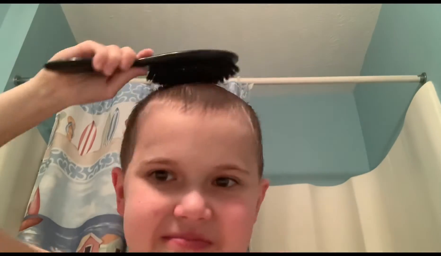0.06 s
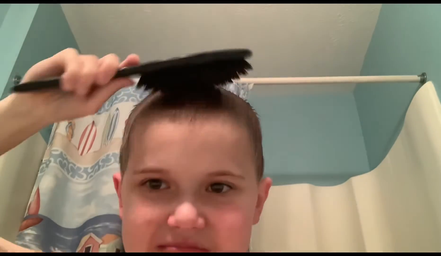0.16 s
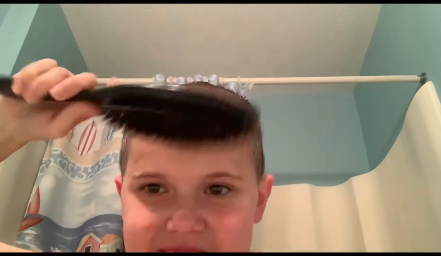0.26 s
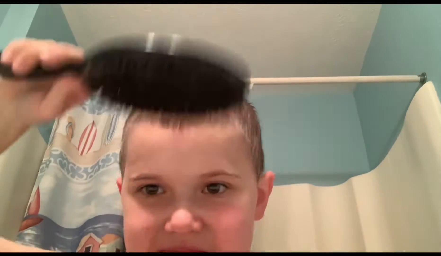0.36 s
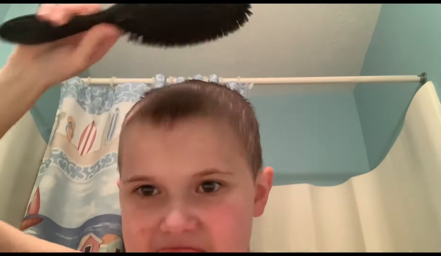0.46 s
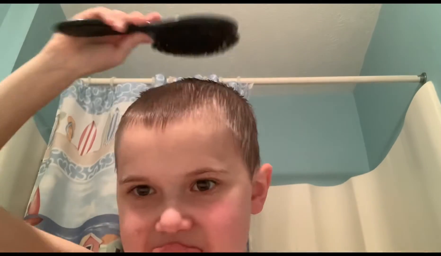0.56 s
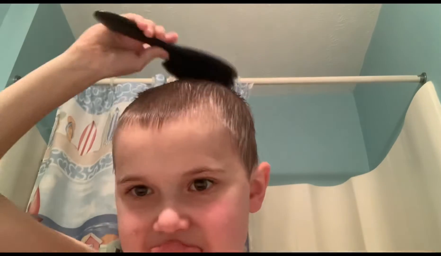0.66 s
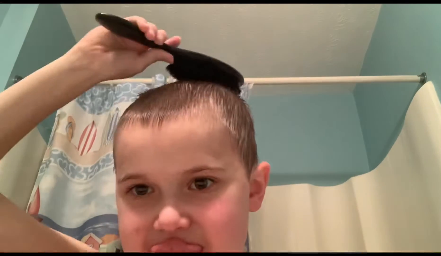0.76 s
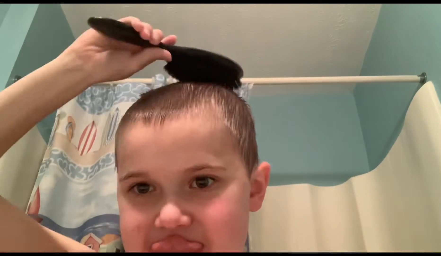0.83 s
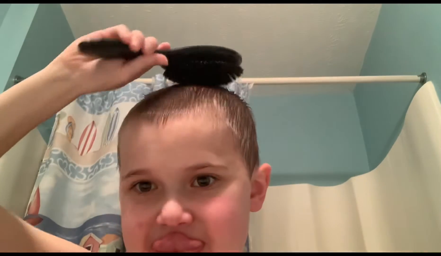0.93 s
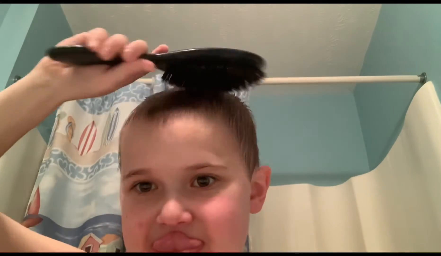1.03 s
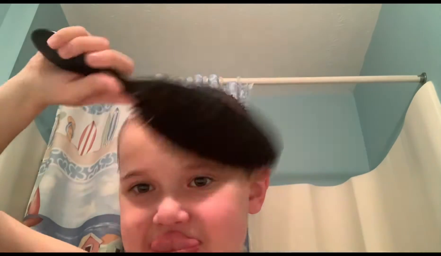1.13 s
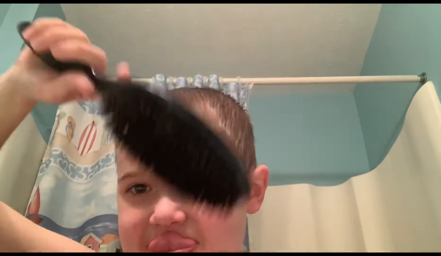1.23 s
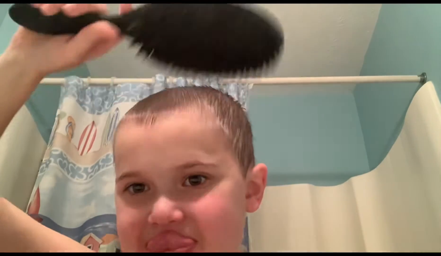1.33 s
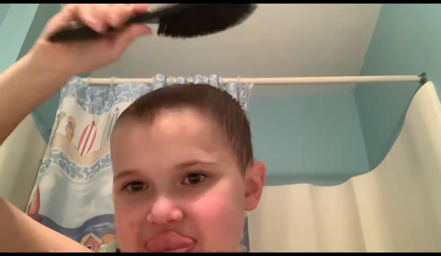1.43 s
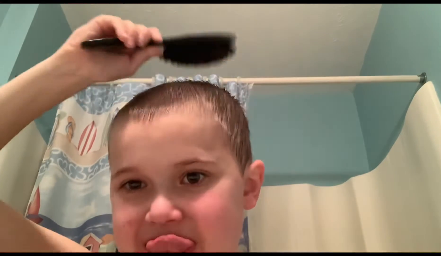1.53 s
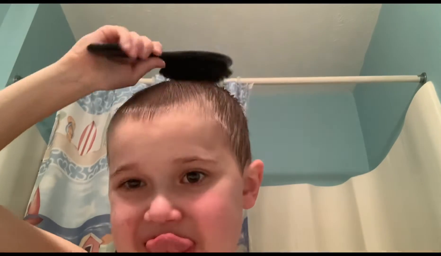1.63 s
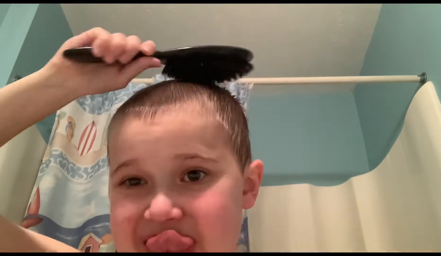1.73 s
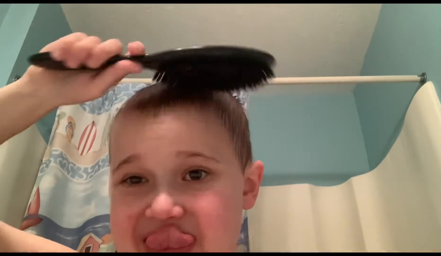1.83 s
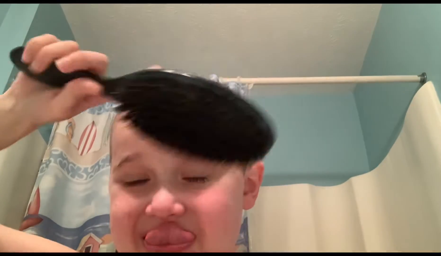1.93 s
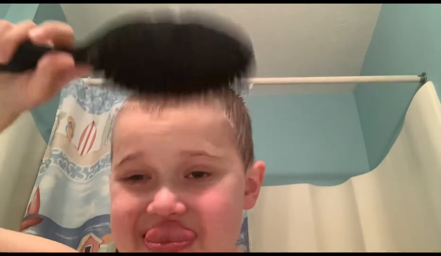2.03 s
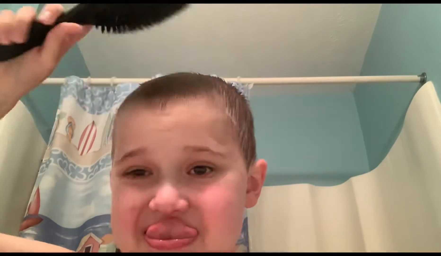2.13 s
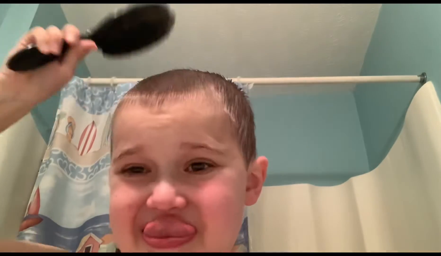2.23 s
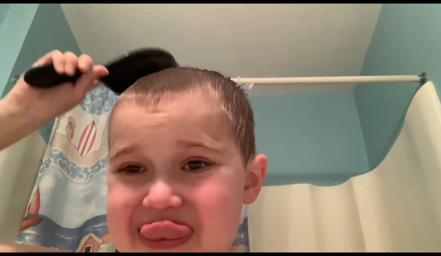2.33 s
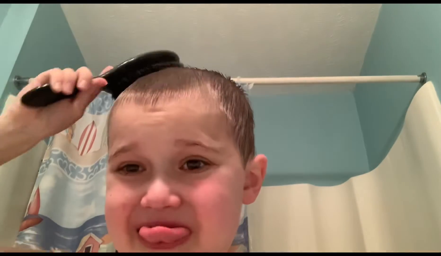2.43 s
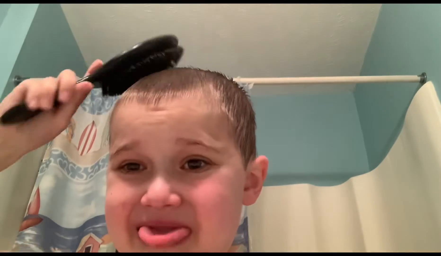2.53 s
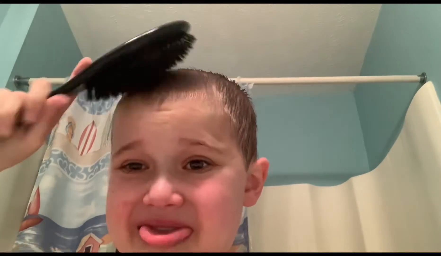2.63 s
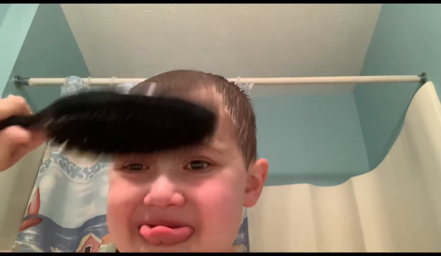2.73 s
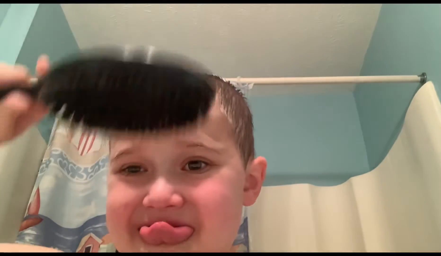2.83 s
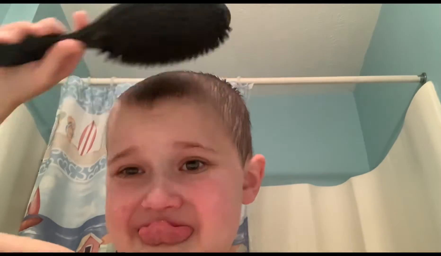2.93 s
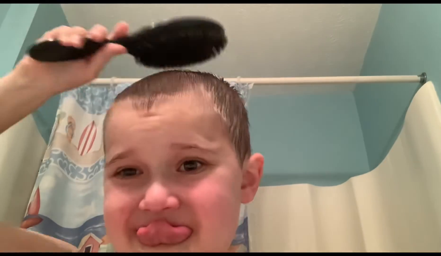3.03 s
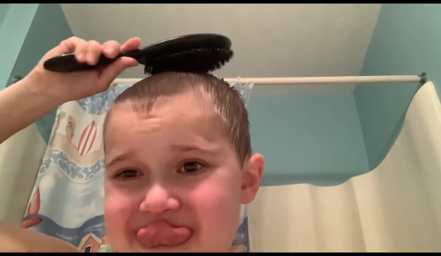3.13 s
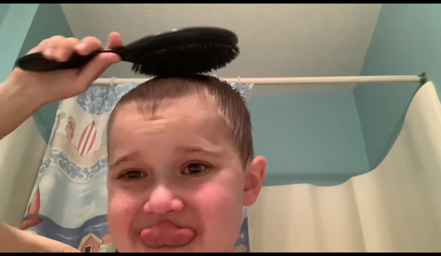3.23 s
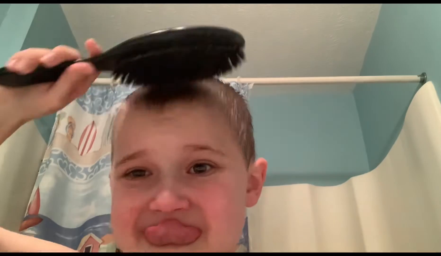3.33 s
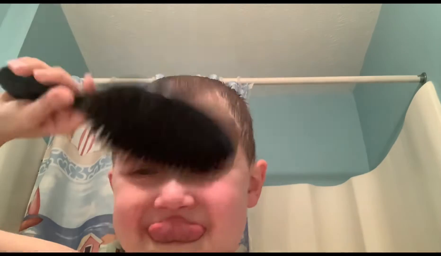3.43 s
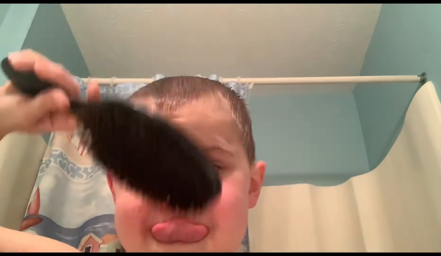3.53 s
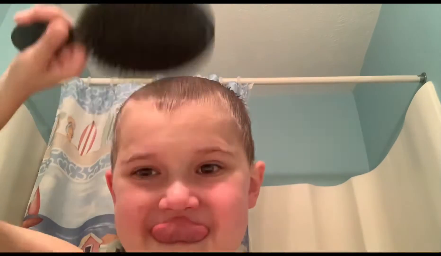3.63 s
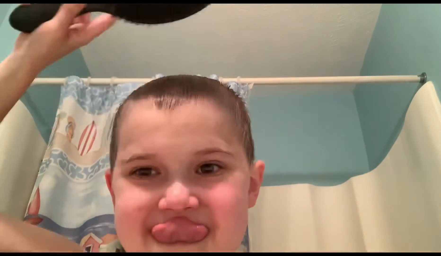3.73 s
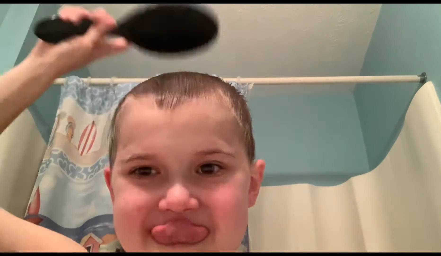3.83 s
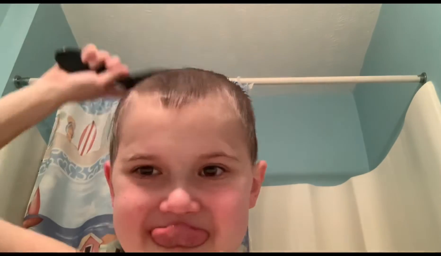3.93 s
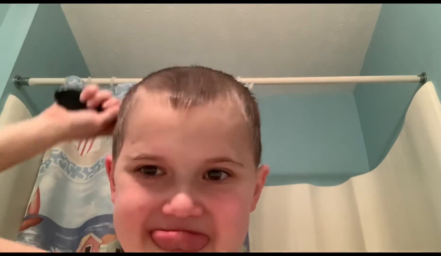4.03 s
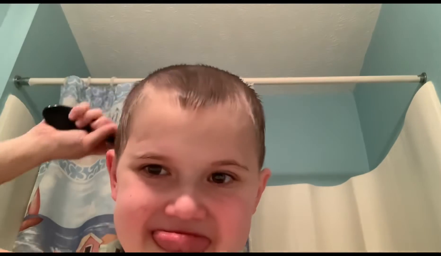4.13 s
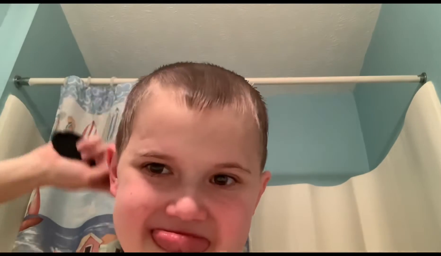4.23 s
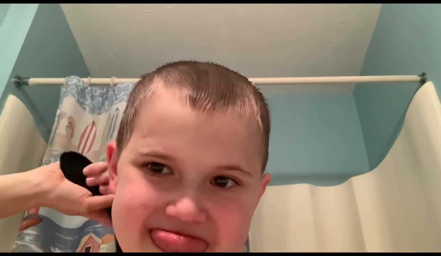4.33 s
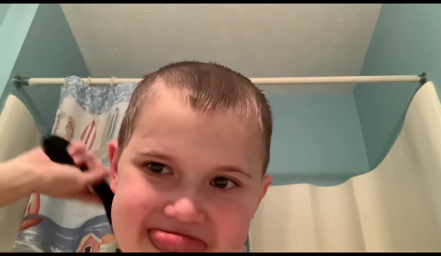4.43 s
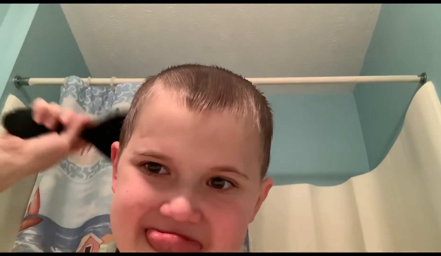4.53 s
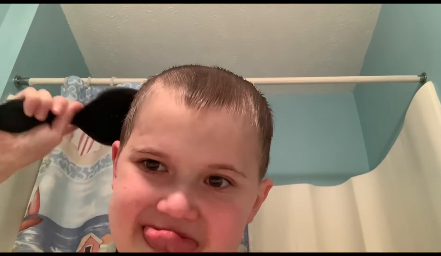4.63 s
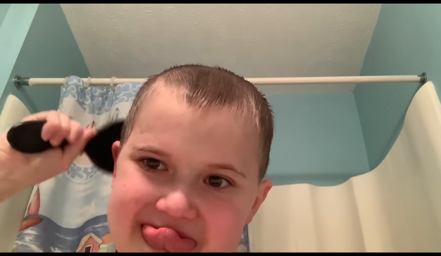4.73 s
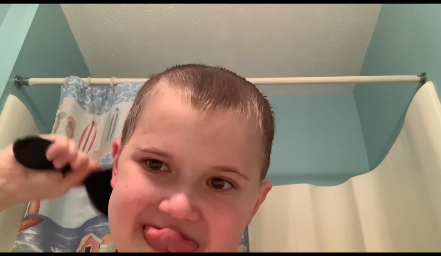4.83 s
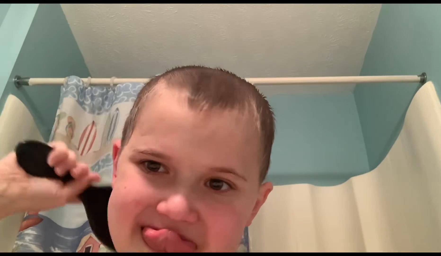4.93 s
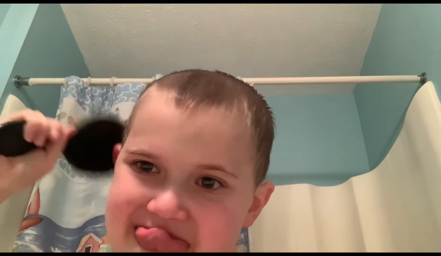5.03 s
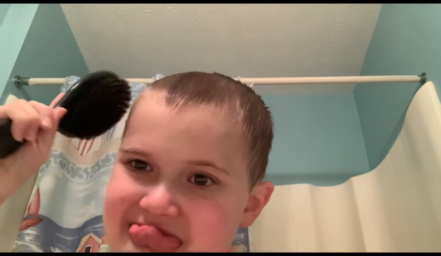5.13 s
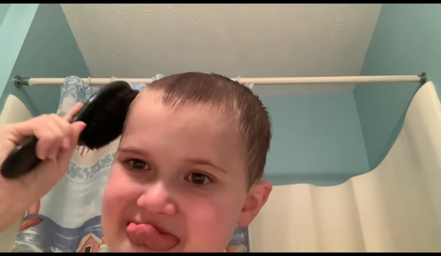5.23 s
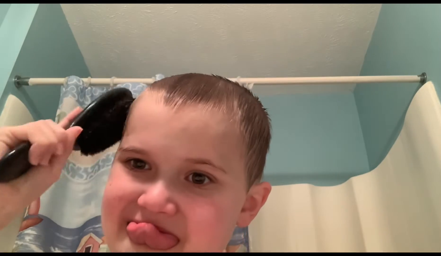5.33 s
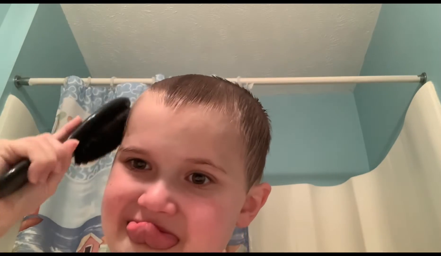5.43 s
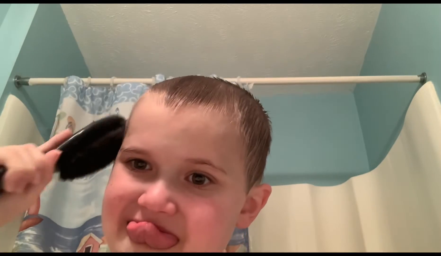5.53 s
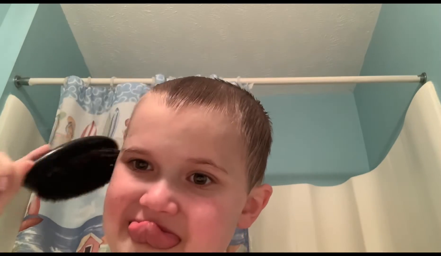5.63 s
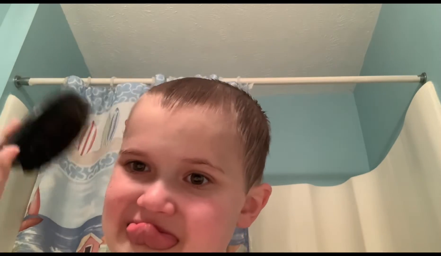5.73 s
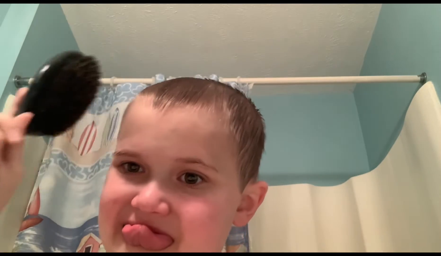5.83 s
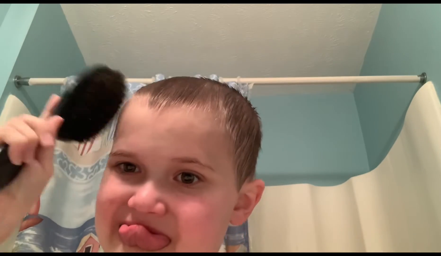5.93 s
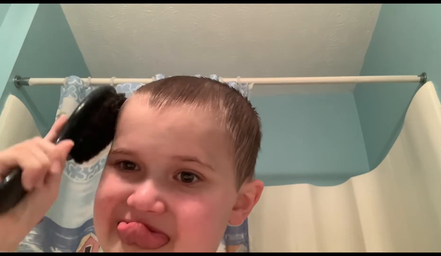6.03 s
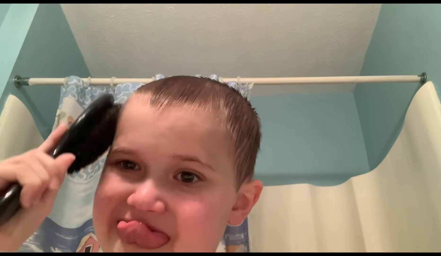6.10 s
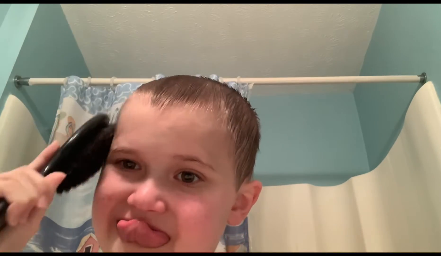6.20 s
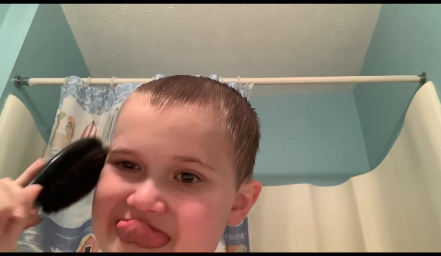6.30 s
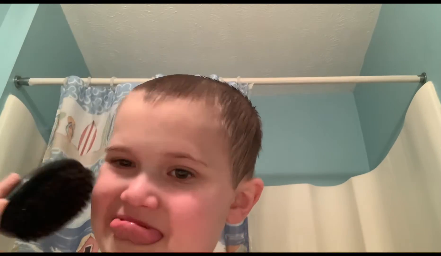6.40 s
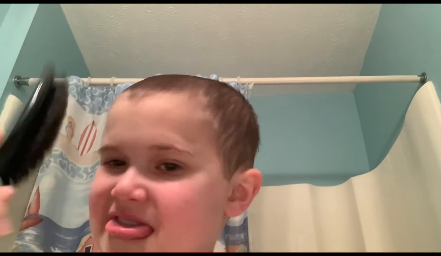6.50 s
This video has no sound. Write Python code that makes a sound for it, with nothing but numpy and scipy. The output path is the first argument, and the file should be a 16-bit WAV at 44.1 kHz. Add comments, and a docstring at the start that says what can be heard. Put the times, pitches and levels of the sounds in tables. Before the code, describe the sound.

A hollow plastic brush taps onto a head, then its bristles rasp through short damp hair in separate swelling strokes, about one every half second to second. Dull knocks and crisp bristle flicks punctuate the early strokes; later ones at the side are duller and softer. Close stereo microphone in a small reflective bathroom, with faint air hiss, low arm-movement rumble and weak fan hum.

```python
"""A tap on hollow plastic opens a swelling rasp: a brush drawn again and again through short damp hair in a bathroom.
Each landing rings the modes of the brush back; then thousands of bristle slips, random clicks, swell and die away.
Bright noise flicks and dull knocks of falling pitch punctuate the strokes; hard walls answer with filtered noise tails.
Underneath lie airy hiss, a low rumble of arm movement, a wavering fan hum and two faint tones, heard at two close ports.
"""
import sys
import numpy as np
from scipy import signal
from scipy.fft import rfft, irfft
from scipy.io import wavfile
from scipy.ndimage import map_coordinates

SR = 44100
rng = np.random.default_rng(int(sys.argv[2]) if len(sys.argv) > 2 else 0)


def inscribe(sig):
    """Save sig as 16-bit PCM at rate SR to the path in sys.argv[1].

    A 1-D sig is mono; a 2-D sig holds one channel per row.
    Samples are clipped to [-1, 1] before scaling.
    """
    pcm = np.round(np.clip(np.atleast_2d(sig).T, -1, 1) * 32767)
    wavfile.write(sys.argv[1], SR, pcm.astype(np.int16))


N = 289254   # length in samples


def from_db(db):
    """Decibels to gain."""
    return 10 ** (np.asarray(db, float) / 20)


def rms_one(x):
    """Scale to unit rms."""
    return x / np.sqrt(np.mean(x ** 2) + 1e-20)


def cut(x, hz, kind, order=2):
    """Butterworth filter."""
    return signal.sosfilt(signal.butter(order, hz, kind, fs=SR, output="sos"), x)


def coloured(x, points):
    """Impose a smooth spectrum, drawn in dB over log frequency."""
    hz, db = np.transpose(points)
    grid = np.fft.rfftfreq(N, 1 / SR) + 1
    gain = from_db(np.interp(np.log(grid), np.log(hz), db, left=-60))
    return irfft(rfft(x) * gain, N)


def drift(rate_hz):
    """Random wander of unit rms: white noise through two equal one-pole low-passes."""
    r = np.exp(-2 * np.pi * rate_hz / SR)
    wander = signal.lfilter([1], [1, -2 * r, r * r], rng.standard_normal(N + SR))
    return rms_one(wander[SR:])   # drop the filter's start-up


def ring(clicks, hz, t60):
    """A resonant mode: a unit click sets off a dying sine of starting height 1."""
    r, w = from_db(-60 / (t60 * SR)), 2 * np.pi * hz / SR
    return signal.lfilter([0, np.sin(w)], [1, -2 * r * np.cos(w), r * r], clicks + 1e-18)


def add(out, s, sound):
    """Mix a sound in at time s."""
    i = round(s * SR)
    out[..., i:i + sound.shape[-1]] += sound[..., :N - i]


# spectrum of room air and hiss: f/Hz, relative density/dB
AIR = [(25, -33), (50, 14), (150, -4), (300, -3), (600, -9), (1200, -9.5), (2500, -14.5), (6000, -18),
       (10000, -17), (15000, -20), (18000, -36)]


def air():
    """Room air and hiss: independent coloured noise at each port."""
    level_db = -58
    return from_db(level_db) * rms_one(coloured(rng.standard_normal((2, N)), AIR))


# swells of arm and floor movement: t/s of the top, length/s, deep level/dB, upper level/dB
RUMBLE = [(0.0, 0.031, -50, -60), (0.224, 0.088, -46, -29), (0.324, 0.068, -48, -38.5),
          (.8, 0.029, -48, -64), (1.296, 0.074, -47, -46), (1.698, .04, -53, -56), (2.493, .04, -55, -55),
          (4.032, 0.11, -49, -38.5), (4.187, .2, -46, -38.5), (4.916, .14, -50.5, -62),
          (5.355, 0.14, -45.5, -61), (5.93, 0.13, -38.5, -57), (6.052, .04, -45, -40),
          (6.427, .1, -39.5, -65), (6.55, 0.1, -46, -40.5)]


def rumble_curves():
    """Bell-shaped swells, quicker up than down, over a still level."""
    rise_share = 0.49          # rise as a share of the length
    still_db = (-66, -58.5)    # deep, upper level between swells
    t = np.arange(N) / SR
    power = from_db(still_db)[:, None] ** 2
    for s, length, *levels_db in RUMBLE:
        width = length * np.where(t < s, rise_share, 1)
        bell = np.exp(-((t - s) / width) ** 2)
        power = power + (from_db(levels_db)[:, None] * bell) ** 2
    return 10 * np.log10(power)


def rumble():
    """Arm and floor movement: two low noise bands with lumpy levels, mostly alike at both ports."""
    out = np.zeros((2, N))
    for level_db, band_hz in zip(rumble_curves(), ([32, 60], [75, 133.8])):
        mid, side = cut(rng.standard_normal((2, N)), band_hz, "band")
        both = rms_one(mid + 0.4 * side * [[1], [-1]])
        lumps_db = 0.5 * drift(22)
        out += from_db(level_db + lumps_db) * both
    return out


def fan_hum():
    """A sine whose pitch and level waver."""
    centre_hz, level_db = 119.8, -55
    hz = centre_hz + 1.684 * drift(4.77)
    phase = 2 * np.pi * np.cumsum(hz) / SR
    waver_db = 0.56 * drift(2.1)
    return from_db(level_db + waver_db) * np.sqrt(2) * np.sin(phase)


# two faint short tones: t/s, f/Hz, level/dB before the fades, length/s
TONES = [(3.032, 662, -64.5, 0.088), (3.65, 542, -62.5, 0.1457)]


def faint_tones():
    """Noise through a narrow resonance, faded in and out."""
    out = np.zeros(N)
    for s, hz, level_db, length in TONES:
        t = np.arange(round(length * SR)) / SR
        tone = ring(rng.standard_normal(3 * len(t)), hz, t60=0.61)[-len(t):]   # resonance already built up
        fade = np.sqrt(np.sin(np.pi * t / length))
        add(out, s, from_db(level_db) * fade * rms_one(tone))
    return out


# reverberation by band: low f/Hz, high f/Hz, t60/s, level/dB
ROOM = [(170, 3300, 0.27, -0.5), (1230, 7370, 0.12, 3.5), (5000, 9300, 0.31, -5.5)]


def bathroom(x):
    """Dense hard-wall reverberation, unlike at the two ports, each band dying at its own rate."""
    t = np.arange(SR // 2) / SR
    noise = rng.standard_normal((2, len(t))) * np.clip(t / 0.0014, 0, 1)
    tail = 0
    for low_hz, high_hz, t60, level_db in ROOM:
        decay = from_db(-60 * t / t60)
        band = cut(noise, [low_hz, high_hz], "band")
        tail = tail + from_db(level_db) * band * decay / np.sqrt(np.sum(decay ** 2))
    return signal.fftconvolve(x[None], tail, axes=1)[:, :N]


# dull knocks and the thuds that follow through floor or shelf:
# t/s, level/dB before the mix gains, starting f/Hz, length/cycles, log pitch fall per cycle
KNOCKS = [(.193, -9, 584, 3.8, 0.28), (.212, -20, 430, 4.9, 0.028), (.245, -21, 77.2, 4.5, 0.0077),
          (0.784, -33, 71.4, 2.4, .01), (1.263, -24, 774, 1.1, 0.05), (1.289, -18, 106, 0.65, 0.046),
          (2.045, -11, 796, 1.16, 0.022), (3.467, -32.5, 342, 2.3, 0.042), (5.199, -40, 383, 2.1, 0.074),
          (5.225, -44.5, 326, 1.7, 0.064)]


def knocks():
    """Padded blows: bending waves bring the high part first, so the pitch falls."""
    out, t = np.zeros(N), np.arange(SR // 2) / SR
    for s, level_db, hz, cycles, fall in KNOCKS:
        turns = np.log(1 + fall * hz * t) / fall
        soft_start = np.sin(np.pi / 2 * np.minimum(turns, 1))
        decay = np.exp(-(turns / cycles) ** 2)
        add(out, s, from_db(level_db) * np.sin(2 * np.pi * turns) * soft_start * decay)
    return out


# ticks and bright bursts, as when bristles spring free together:
# t/s, relative level/dB, lower edge f/Hz, length/s
FLICKS = [(0.19, -20.5, 1170, 0.0063), (0.514, -44, 3120, 0.0041), (1.534, -39, 5000, 0.0023),
          (1.963, -17, 7700, 0.018), (2.342, -23.5, 6150, 0.0012), (3.464, -12.5, 4270, 0.015),
          (4.733, -59, 1500, .008), (5.063, -33.5, 6050, 0.033), (5.18, -32.5, 8150, 0.05)]


def flicks():
    """Short bursts of high-passed noise with a quick rise and a tail."""
    out, t = np.zeros(N), np.arange(SR // 4) / SR
    for s, level_db, edge_hz, length in FLICKS:
        noise = cut(rng.standard_normal(len(t)), edge_hz, "high", order=3)
        shape = np.minimum(t / 0.0018, 1) * np.exp(-(t / length) ** 2.2)
        add(out, s, from_db(level_db) * noise * shape / 2)
    return out


# modes of the hollow brush back: f/Hz, relative level/dB, undamped t60/s
BACK = [(640, -12, .06), (1010, -8, .08), (1100, 0, .15), (1179, -1, .15), (1270, -6, .07),
        (1460, -11, .05), (1640, -11, .05), (2000, -15, .03)]
# brush lands on the head: t/s, tap peak level/dB before panning, relative bristle crunch level/dB,
# pan/dB (left above right)
LANDINGS = [(0.004, -31, -51.5, 1), (0.775, -36, -50, -0.5), (1.678, -26, -50.5, -2.5),
            (1.77, -41.5, -54, -8), (2.472, -36.5, -52.5, 15.5), (3.174, -41.5, -58, 3),
            (4.1, -42.5, -72, -4), (4.632, -50, -50.5, 16), (5.071, -48, -53, 9), (5.18, -59, -56.5, 5),
            (5.293, -50, -57, 5), (6.036, -32.5, -44.5, 6)]


def landings():
    """A cushioned touch of a few milliseconds rings the modes of the back, unevenly each time."""
    tap_damping = 0.65   # hand and hair shorten the ring
    out, t = np.zeros((2, N)), np.arange(SR // 4) / SR
    for s, peak_db, _, pan_db in LANDINGS:
        touch = rng.standard_normal(len(t)) * t * np.exp(-t / 0.0045)
        touch = touch / np.sqrt(np.sum(touch ** 2))
        tap = 0
        for hz, db, t60 in BACK:
            uneven_db = rng.standard_normal()
            tap = tap + from_db(db + uneven_db) * ring(touch, hz, tap_damping * t60)
        tap = cut(tap, 614, "high", order=4)   # the small back radiates no bass
        sound = from_db(peak_db) * tap / np.abs(tap).max()
        # start early: the touch needs a moment to build up
        add(out, s - 0.003, sound * from_db([[pan_db / 2], [-pan_db / 2]]))
    return out


def slips(per_s, spread_db, clump_db):
    """Bristle tips stick and slip on hairs: dense clicks of uneven size, coming in clumps."""
    sizes = from_db(spread_db * np.minimum(rng.exponential(1, N), 5)) * rng.choice([-1, 1], N)
    born = rng.random(N) < per_s / SR
    return rms_one(sizes * born * from_db(clump_db * drift(65)))


def patchy(x, patchy_db):
    """Different tufts engage from moment to moment, so each band swells on its own."""
    edges_hz = np.geomspace(850, 9000, 8)
    lows = [cut(x, hz, "low") for hz in edges_hz]
    bands = [high - low for low, high in zip(lows, lows[1:] + [x])]
    return lows[0] + sum(band * from_db(patchy_db * drift(15.5)) for band in bands)


# pulls through the hair, some in two pushes: t/s of the fastest moment, swell length/s,
# relative rasp level/dB, ringing back level/dB above rasp, thin treble level/dB above rasp
STROKES = [(0.311, .27, -42, 7, 7.5), (1.148, 0.39, -45, 6, 4.5), (1.863, 0.081, -45, 9, -20),
           (1.944, 0.27, -44, 4, 4), (2.742, 0.32, -41, 4, 3.5), (3.338, 0.14, -45.5, 2, -1.5),
           (3.463, 0.23, -42.5, 4, 6.5), (4.359, 0.23, -37.5, 1, -29), (4.808, 0.073, -50, 2.5, -15),
           (4.888, 0.17, -40, -0.5, -1.5), (5.085, 0.072, -48, 6.5, 4.5), (5.194, .03, -67, -6, -12),
           (5.552, 0.17, -49.5, 3.5, -13.5), (5.686, 0.3, -42, 1, -3), (6.191, 0.15, -49, 3, -23),
           (6.403, 0.38, -43, 0.5, -15), (6.55, .15, -57, 2.5, -21)]


def stroke_curves():
    """Each pull swells from its landing and falls as the brush lifts; each landing adds a dying crunch."""
    swell_db, swell_curve = 25, 1.283   # rise over the swell length; a curve above 1 rounds the top
    lift_s, lift_curve = 0.098, 1.55    # time of the same fall as the bristles leave the hair
    ring_follows_swell, ring_follows_lift = 0.77, 1.34   # share of the rasp's dB change
    treble_follows = 1.31               # slow bristles sound duller
    grip_s = 0.02                       # bristles take hold after the landing
    # crunch of bristles sinking in
    settle_rise_s, settle_db_per_s, settle_ring_db, settle_treble_db = 0.0028, 279, 7, -46
    t, landed = np.arange(N) / SR, np.array([row[0] for row in LANDINGS])
    power = np.full((3, N), 1e-12)   # rasp, ring, treble
    for s, swell_s, rasp_db, ring_db, treble_db in STROKES:
        rise = swell_db * (np.maximum(s - t, 0) / swell_s) ** swell_curve
        fall = swell_db * (np.maximum(t - s, 0) / lift_s) ** lift_curve
        ring_below = ring_follows_swell * rise + ring_follows_lift * fall - ring_db
        treble_below = treble_follows * (rise + fall) - treble_db
        below = np.array([rise + fall, ring_below, treble_below])
        touching = np.clip((t - landed[landed < s].max()) / grip_s, 0, 1)
        power += touching * from_db(rasp_db - below) ** 2
    for s, _, crunch_db, _ in LANDINGS:
        since = np.maximum(t - s, 0)
        sinking = np.minimum(since / settle_rise_s, 1) * from_db(crunch_db - settle_db_per_s * since)
        power += (sinking * from_db([[0], [settle_ring_db], [settle_treble_db]])) ** 2
    rasp_db, ring_db, treble_db = 10 * np.log10(power)
    return rasp_db, ring_db - rasp_db, treble_db - rasp_db


# spectrum of the bristle rasp: f/Hz, relative density/dB
RASP = [(250, -29), (420, -18), (600, 0), (1500, 3), (2100, 1.5), (2800, -1), (4500, -2.5), (6500, 0),
        (9500, -4), (11000, -3), (13500, 0), (18000, 0)]


def strokes():
    """Slips radiate directly as rasp and shake the modes of the brush back."""
    rasp_db, ring_db, treble_db = stroke_curves()
    clicks = slips(per_s=15000, spread_db=1.0, clump_db=1.5)
    rasp = patchy(coloured(clicks, RASP), patchy_db=1.8)
    rasp = rasp / np.std(cut(rasp, [2000, 6000], "band", order=4))
    dull = cut(rasp, 8000, "low", order=1)
    middle, high = cut(dull, 944, "high"), rasp - dull
    # dull rub carried by the scalp; strokes hidden behind the head lose it along with treble
    scalp = rms_one(cut(cut(rasp, 796, "low", order=4), 580, "high"))
    scalp_db = -9.5 + 0.37 * treble_db
    # the head damps the pressed back, so it rings shorter than when tapped; heavier catches drive it
    catches = clicks * from_db(2.2 * drift(40) + 1.5 * drift(9))
    back = rms_one(sum(from_db(db) * ring(catches, hz, 0.28 * t60) for hz, db, t60 in BACK))
    layers = middle + from_db(treble_db) * high + from_db(ring_db) * back + from_db(scalp_db) * scalp
    return from_db(rasp_db) * layers


# where the brush is: t/s, lag of the left port/ms
BEARING = [(0, 0.091), (2.1, 0.077), (2.5, 0.033), (2.9, 0.02), (3.2, 0.0084), (3.6, 0.13), (4.1, 0.0088),
           (6.56, 0)]


def at_ports(x):
    """Sound from one side reaches the left port a little late."""
    s, lag_ms = np.transpose(BEARING)
    samples = np.arange(N)
    late = samples - np.interp(samples / SR, s, lag_ms) * SR / 1000
    return np.array([map_coordinates(x[0], [late], order=3, mode="nearest"), x[1]])


def scene():
    """Direct sound plus room over the background."""
    background = air() + rumble() + fan_hum() + faint_tones()
    blows, taps = knocks(), landings()
    brush = from_db(-2.5) * (strokes() + flicks())
    direct = at_ports(brush + taps + blows * from_db([[-2.5], [-0.6]]))
    return direct + bathroom(brush + taps.mean(axis=0) + from_db(1.5) * blows) + background


def top_cut(x):
    """Nothing passes above the cut-off."""
    return signal.sosfilt(signal.butter(12, 16480, fs=SR, output="sos"), x)


# treble stereo of the finished mix: f/Hz, likeness of right channel to left (0-1), phase turn/rad
TREBLE_STEREO = [(4800, 0, -2.3), (5800, .35, -2.3), (6800, .6, -2.1), (7500, .8, -2.5), (8100, .98, -3.1),
                 (9700, .98, -3.2), (10300, .8, -3.7), (11400, .72, -4.8), (12300, .85, -5.8),
                 (12900, .98, -6.28), (17000, .99, -6.28)]


def record(dry):
    """A steep low-pass; then, in the treble, the right channel becomes mostly the left turned in phase."""
    low_pass = signal.cheby2(22, 60, 16000, fs=SR, output="sos")   # 60 dB down from 16 kHz
    left, right = rfft(signal.sosfilt(low_pass, dry))
    hz, alike, turn = np.transpose(TREBLE_STEREO)
    grid = np.fft.rfftfreq(N, 1 / SR)
    alike = np.clip(np.interp(grid, hz, alike), 0, 1)
    turn = np.interp(grid, hz, turn)
    right = np.sqrt(1 - alike ** 2) * right + alike * np.exp(1j * turn) * left
    mix = irfft(np.array([left, right]), N)
    return top_cut(mix)


dry = scene()
out = record(dry)
inscribe(out)
```